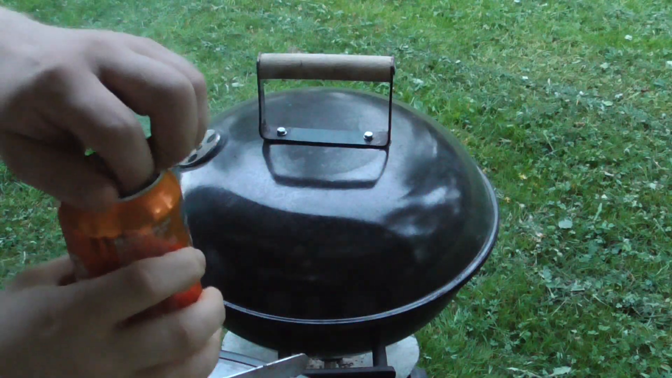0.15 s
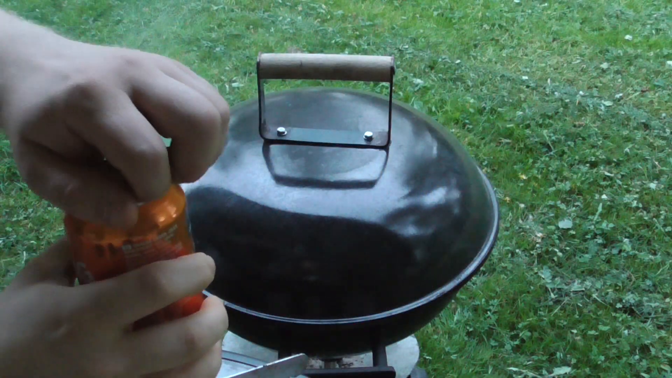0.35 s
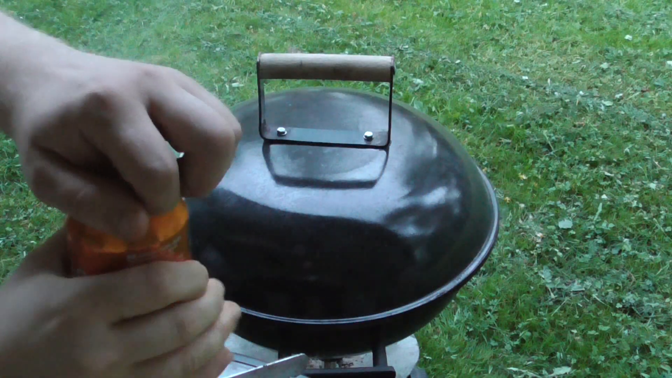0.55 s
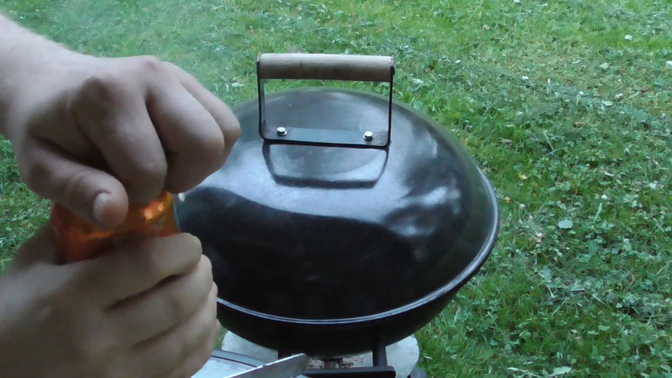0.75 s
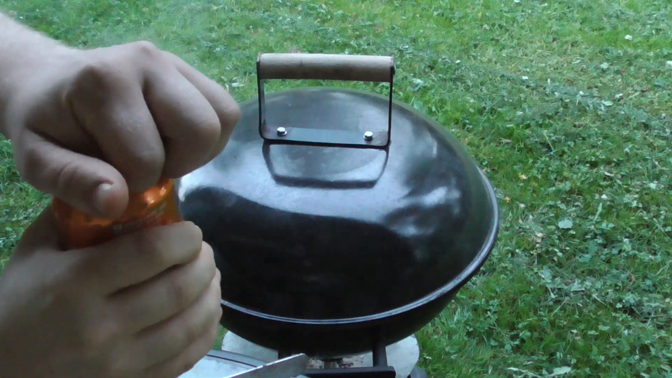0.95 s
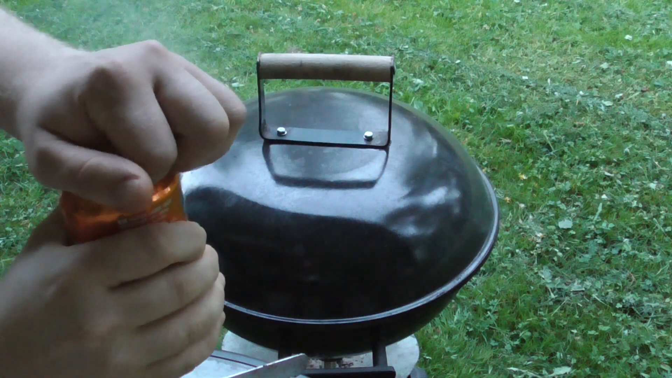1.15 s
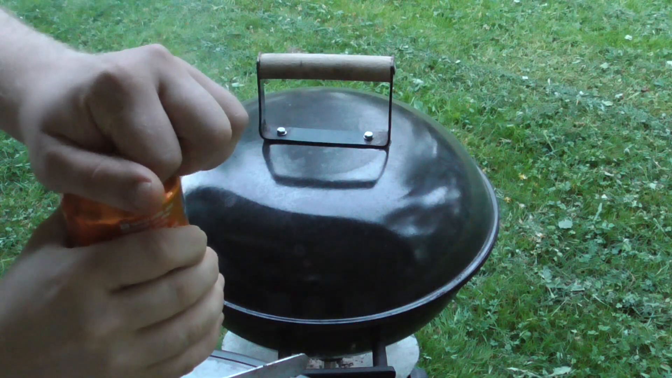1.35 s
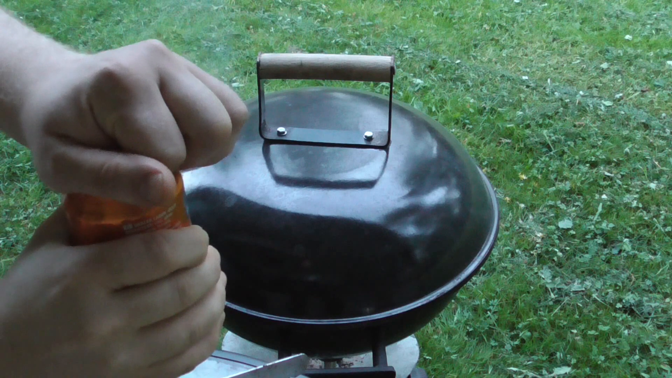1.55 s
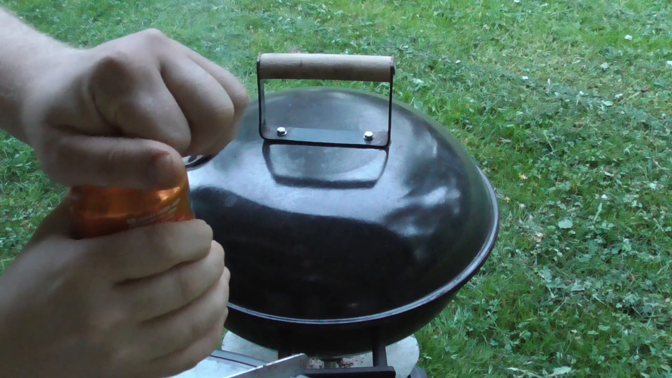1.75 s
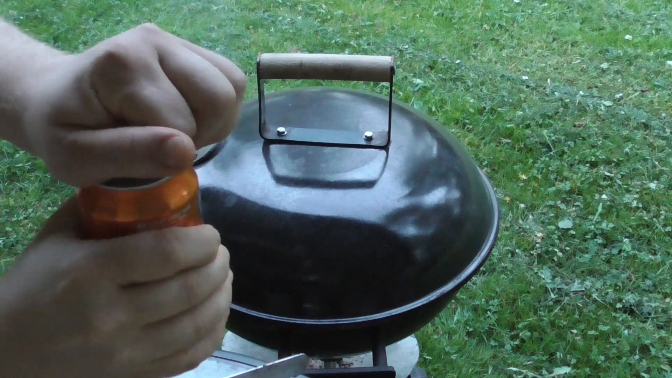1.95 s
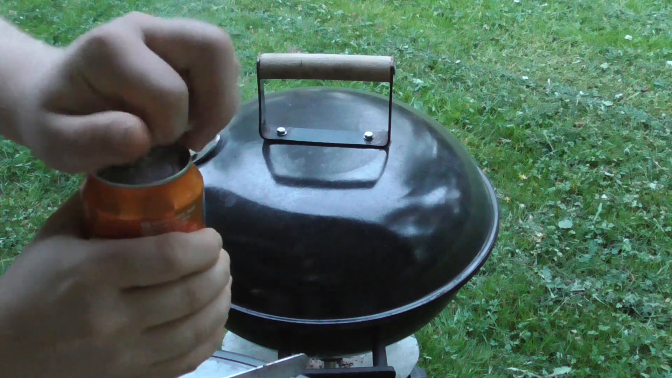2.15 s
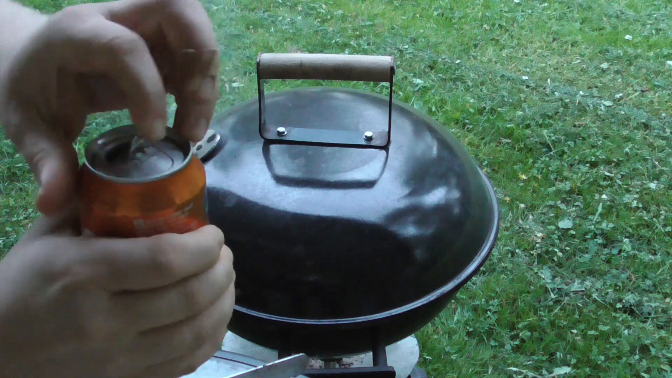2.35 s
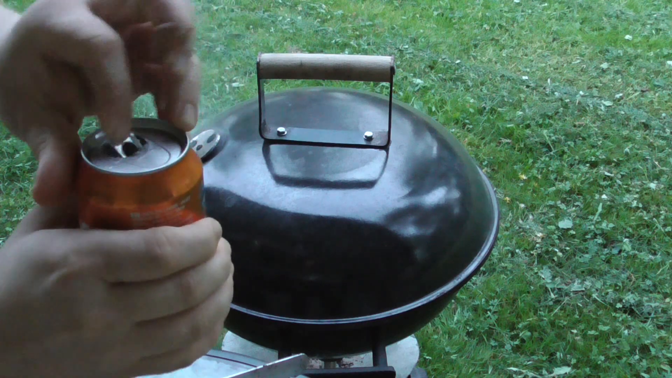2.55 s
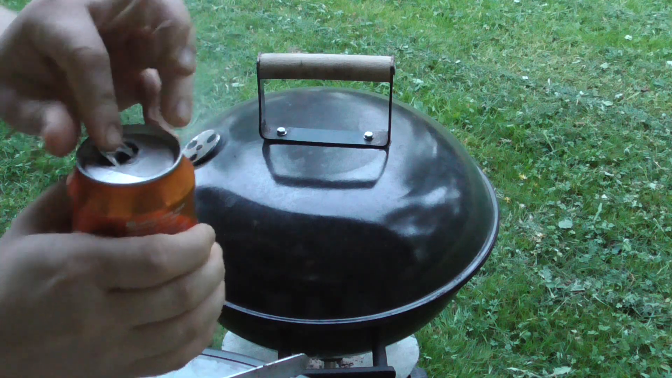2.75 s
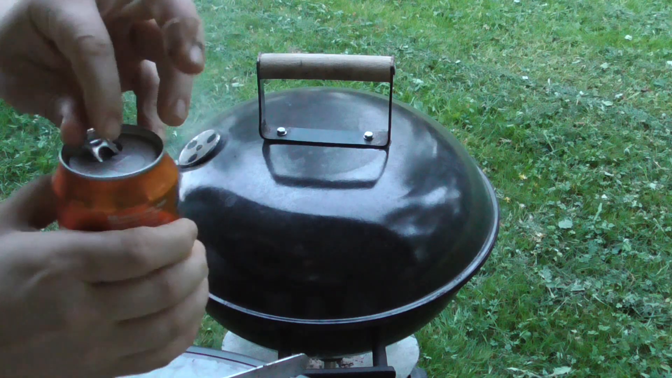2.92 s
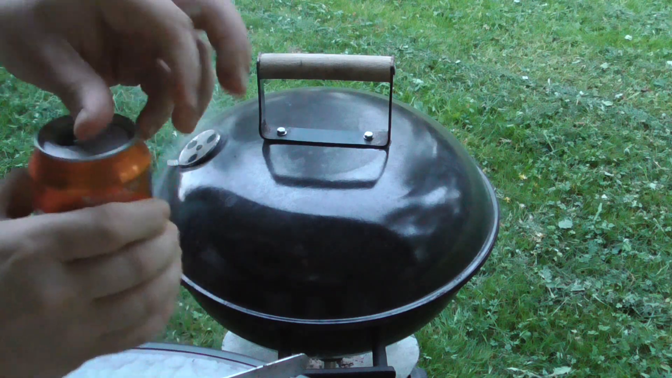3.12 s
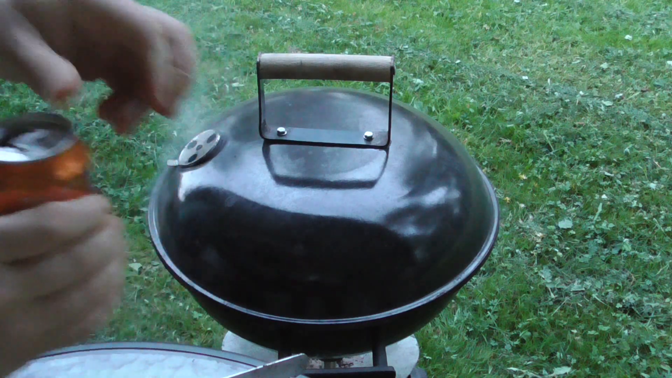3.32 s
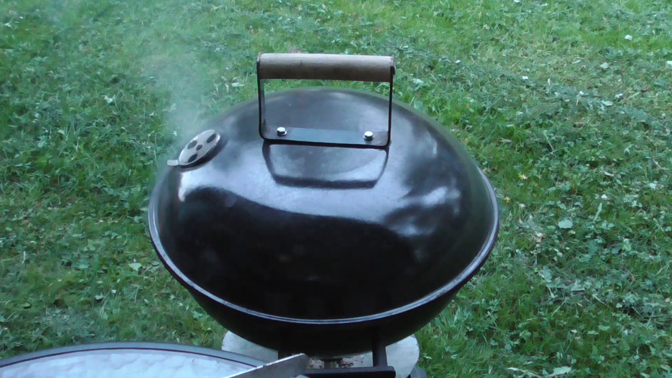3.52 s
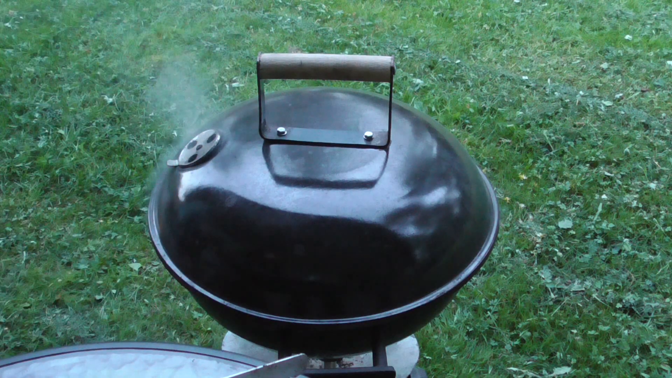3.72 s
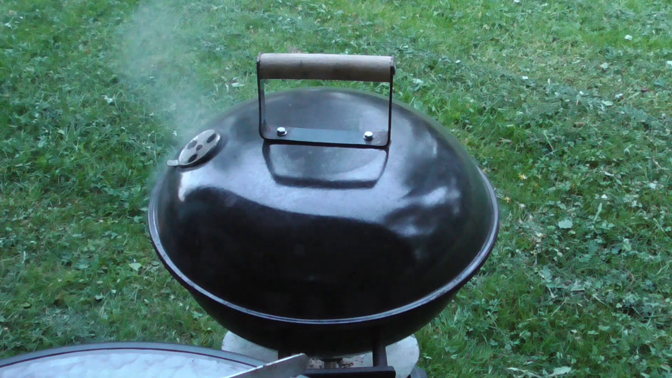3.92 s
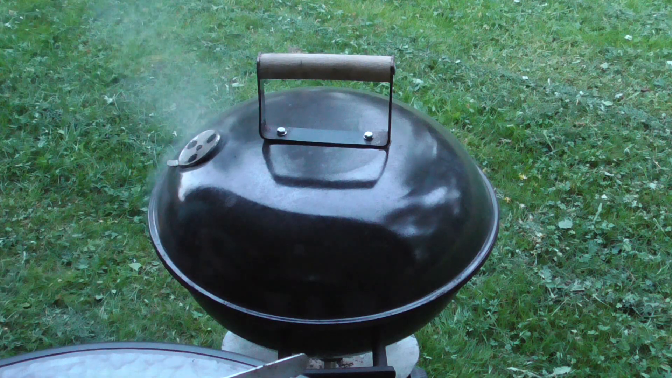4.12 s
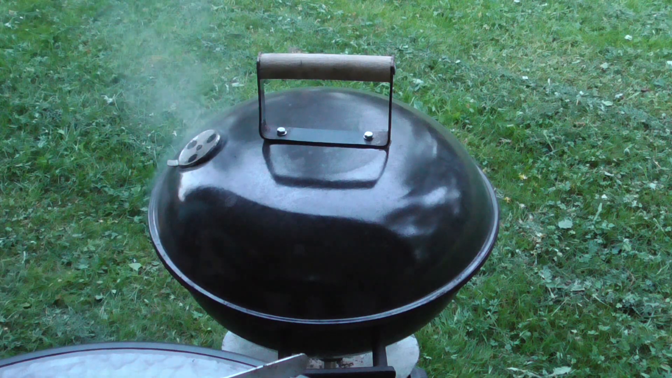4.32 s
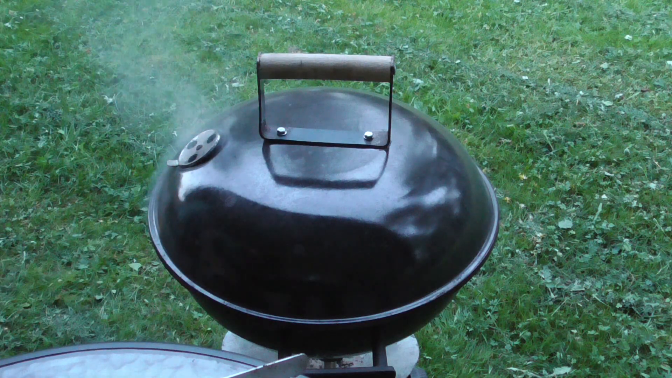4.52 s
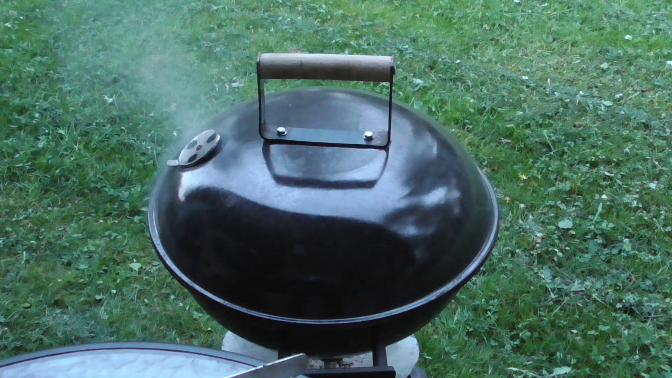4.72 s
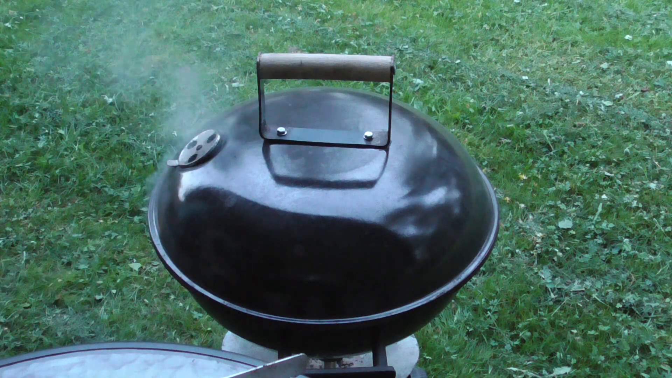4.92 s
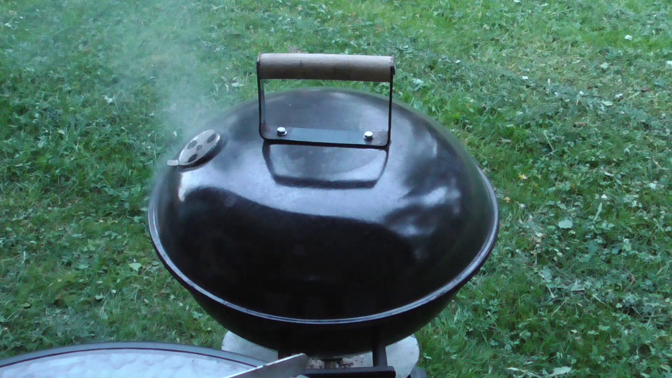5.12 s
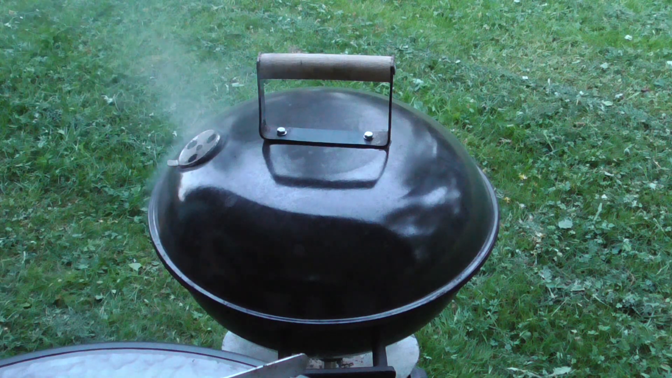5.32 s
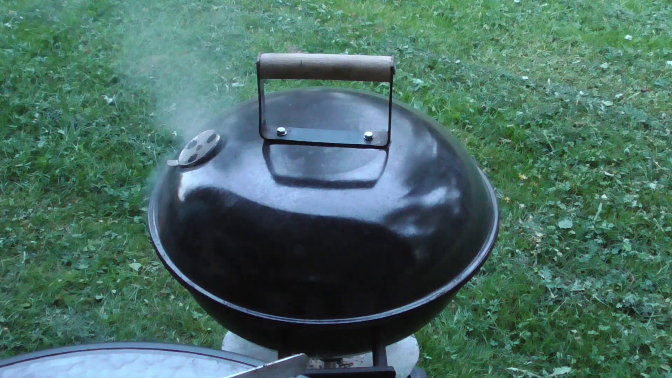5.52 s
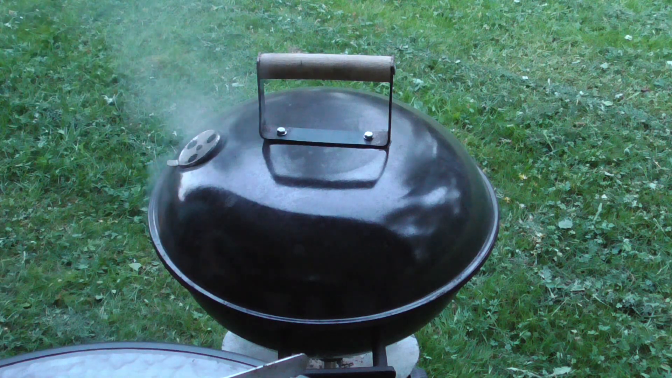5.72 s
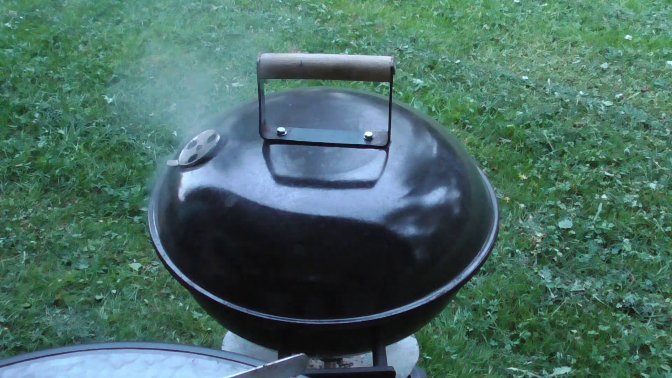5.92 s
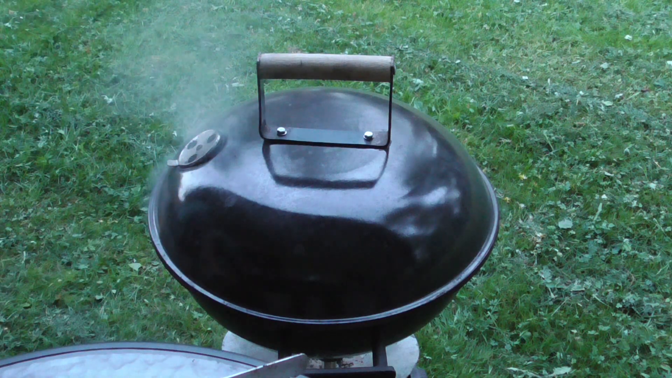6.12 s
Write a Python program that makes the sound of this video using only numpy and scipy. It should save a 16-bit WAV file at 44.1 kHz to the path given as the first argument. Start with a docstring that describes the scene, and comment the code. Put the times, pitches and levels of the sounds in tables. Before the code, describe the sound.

In a quiet garden, skin and nails brush a metal can near the microphone while a distant bird trills. The can cracks open sharply, gas spits out for a tenth of a second, then the lid tears in two more snaps, the last fuller and hollower. Small ticks and rubbing fade away, leaving far traffic, faint peeps and soft dull thuds. Near sounds are dry with slight outdoor scatter.

```python
"""Opening a drink can on a lawn

An aluminium can is heard close by: its vent cracks and gas jets out, the score line tears in two more
cracks, then fingers click and rub the tab. Struck metal is a sum of damped modes, rubbing drives the modes
with stick-slip ticks, and gas is shaped noise. Far traffic, engines, a thin whine, birds and a few dull
knocks fill the garden; a gain control sags after the loudest crack. Levels are those ahead of record()."""
import sys
import numpy as np
from scipy import signal
from scipy.fft import rfft, irfft
from scipy.io import wavfile
from scipy.ndimage import uniform_filter1d

SR = 44100
rng = np.random.default_rng(int(sys.argv[2]) if len(sys.argv) > 2 else 0)


def dump(signal):
    """Clip the signal to [-1, 1] and save it as 16-bit WAV at the path in sys.argv[1]."""
    limited = np.clip(np.atleast_2d(signal).T, -1, 1)
    pcm = np.round(limited * 32767).astype(np.int16)
    wavfile.write(sys.argv[1], SR, pcm)


N = 272097
T = np.arange(N) / SR  # time in s

# modes of the can's body and drinking hole: f/Hz, relative level/dB, t60/s when free to ring
BODY_MODES = [(590, -10, 0.035), (780, -1, 0.027), (932, 0, 0.03), (1086, 3.5, 0.01), (1250, 3, 0.023),
              (1443, -1.5, 0.04)]
# modes of the lid: f/Hz, relative level/dB, t60/s when free to ring
LID_MODES = [(2082, -6.5, 0.02), (2537, -3.5, 0.012), (3515, 2, 0.0041), (4240, -3, 0.01),
             (4822, 2.5, 0.0083), (5615, -0.5, 0.016)]
# modes of the tab and torn edge: f/Hz, relative level/dB, t60/s when free to ring
EDGE_MODES = [(6436, -5.5, 0.015), (7090, -6.5, 0.013), (8250, -3, 0.0055), (9270, -6, 0.0073),
              (10130, -3.5, 0.004), (11180, -3.5, 0.0051), (12930, -1, 0.0026), (14300, -7, 0.0058),
              (16000, -13.5, 0.0049)]


def amp(db):
    """Level: 20 dB is a factor of ten in amplitude."""
    return 10 ** (np.asarray(db) / 20)


def evened(x):
    """Normalization: scales a signal to rms 1."""
    return x / np.sqrt(np.mean(x ** 2) + 1e-20)


def follow(points, outside=None):
    """Linear interpolation: reads a table of t/s and value at every sample."""
    t, value = np.transpose(points)
    return np.interp(T, t, value, outside, outside)


def read(points, hz):
    """Spectral interpolation on a log-frequency axis."""
    f, value = np.transpose(points)
    return np.interp(np.log(hz + 1), np.log(f + 1), value)


def coloured(x, points, share=1):
    """Linear filtering: weights the spectrum by a share of a dB table."""
    hz = np.fft.rfftfreq(x.shape[-1], 1 / SR)
    return irfft(rfft(x) * amp(share * read(points, hz)), x.shape[-1])


def ring(drive, modes):
    """Modal superposition: the drive excites exponentially dying modes; a unit blow peaks at 1."""
    t = T[:4096]
    reply = np.zeros(len(t))
    for k, (hz, db, t60) in enumerate(modes):
        reply += (-1) ** k * amp(db - 60 * t / t60) * np.sin(2 * np.pi * hz * t)
    return signal.oaconvolve(drive, reply / abs(reply).max())[:len(drive)]


def resonate(x, hz, width):
    """Heterodyning: shifts the gliding frequency hz to zero, smooths twice, and shifts back."""
    turn = np.exp(2j * np.pi * np.cumsum(hz * np.ones(len(x))) / SR)
    r = np.exp(-np.pi * width / SR)
    smooth = signal.lfilter([1], np.convolve([1, -r], [1, -r]), x / turn)
    return evened((turn * smooth).real)


def wash(colour, same, patchy_db):
    """Partial coherence: stereo noise from random short-time spectra with drifting patches."""
    frames, hz = N // 256 + 5, np.fft.rfftfreq(1024, 1 / SR)
    a, b, c, d, patches = rng.standard_normal((frames, 513, 5)).T
    patches = uniform_filter1d(patches, size=10, axis=0)
    patches = evened(uniform_filter1d(patches, size=14, axis=1))
    same = np.clip(same, -1, 1)
    left = a + 1j * b
    right = same * left + np.sqrt(1 - same ** 2) * (c + 1j * d)
    gain = amp(read(colour, hz)[:, None] + patchy_db * patches)
    noise = signal.istft(np.array([left, right]) * gain, nperseg=1024, noverlap=768)[1]
    return evened(noise[:, :N])


def blows():
    """Impulsive excitation: rows of t, body, lid and edge dB, their favoured Hz, slip ms, freedom."""
    # the score line tears slip by slip: t/s, body level/dB, lid level/dB, edge level/dB,
    # lid favoured f/Hz, edge favoured f/Hz, freedom to ring (factor on t60)
    tears = [(1.2467, -35.5, -8.5, -8, 4470, 9200, 0.58), (1.2957, -28.5, -8.5, -14, 4220, 10700, .8),
             (1.6686, -38, -19, -8, 3760, 11100, 0.56), (1.6703, -33.5, -16, -2.5, 3600, 11400, 0.36),
             (1.671, -40, -24, -27.5, 4854, 9250, .5), (1.927, -37.5, -25, -23.5, 4140, 6800, 0.79),
             (1.9313, -44.5, -28.5, -17, 2080, 11260, 0.87), (1.9351, -42.5, -26.5, -22.5, 4700, 6700, 1.1),
             (1.9385, -36.5, -26, -24.5, 3400, 6740, 1.4), (1.9461, -34.5, -27.5, -15, 2100, 11270, 0.8),
             (1.9502, -33.5, -25, -15.5, 2070, 6570, 1.1), (1.9553, -34.5, -15.5, -14, 3440, 10160, 0.45),
             (1.9566, -20, -9.5, -5, 3460, 10050, 1.1), (1.9578, -24.5, -11, -9.5, 2026, 8530, 0.74)]
    # fingers and tab tap the lid: t/s, body level/dB, lid level/dB, edge level/dB,
    # body favoured f/Hz, freedom to ring (factor on t60)
    taps = [(0.584, -42, -46, -57, 1450, 2.3), (0.8795, -51, -50, -68, 1430, .8),
            (0.9886, -55.5, -46.5, -50, 1590, .8), (2.249, -36, -34.5, -49, 820, 0.73),
            (2.2664, -47, -48, -59.5, 846, .7), (2.3872, -33.5, -44.5, -43, 1100, 1.6),
            (2.398, -47, -49, -63, 1030, .9), (2.4454, -42.5, -62, -65, 1140, 1.1),
            (2.572, -38.5, -41, -37, 1166, 0.75), (2.739, -51, -60, -39, 1250, .7),
            (2.944, -42, -60, -57, 885, 1.1), (2.9549, -40.5, -57.5, -53, 888, 1.4),
            (3.1275, -41, -44.5, -68, 1390, 1.3), (3.635, -42.5, -48.5, -53, 1340, .8)]
    # the tab ticks on its rivet as it bends: t/s, body level/dB, lid level/dB, edge level/dB,
    # lid favoured f/Hz, edge favoured f/Hz
    ticks = [(1.5593, -61, -53, -43.5, 4500, 10690), (2.6018, -41.5, -44, -33, 4700, 9200),
             (2.6083, -46, -34, -37, 4700, 9700), (2.6134, -45, -38, -35, 4300, 9740),
             (2.6177, -41.5, -35, -28, 4300, 9350), (2.6254, -38.5, -46, -22.5, 3800, 9400),
             (2.631, -33.5, -27, -41, 3260, 8590), (2.6489, -42, -44, -40, 4300, 11110),
             (3.5403, -60, -43.5, -36, 3420, 7460), (3.5743, -62, -38.5, -38.5, 4700, 7430)]
    hole_opens_s = 1.9556
    shut_hz, open_hz = 1352, 710  # the body rings lower once the drinking hole is open
    tap_lid_hz, tap_edge_hz, tick_body_hz = 2000, 9500, 961
    tear_ms, tap_ms, tick_ms = 0.55, 0.43, 0.35  # time scale of a slip
    tick_free = 0.6  # fingers damp the metal

    rows = []
    for s, body_db, lid_db, edge_db, lid_hz, edge_hz, free in tears:
        body_hz = open_hz if s > hole_opens_s else shut_hz
        rows.append((s, body_db, lid_db, edge_db, body_hz, lid_hz, edge_hz, tear_ms, free))
    rows += [(*row, tap_lid_hz, tap_edge_hz, tap_ms, free) for *row, free in taps]
    rows += [(*row[:4], tick_body_hz, *row[4:], tick_ms, tick_free) for row in ticks]
    return rows


def clicks():
    """Local modal excitation: each slip, a run of tiny fractures, shakes modes near its spot most."""
    linger_db, linger_longer = -21.5, 5.1  # a faint part escapes the grip and lasts longer
    out, t = np.zeros(N + 4400), T[:4400]
    fade = np.cos(t / t[-1] * np.pi / 2)
    rows = blows()
    chance = rng.standard_normal((len(rows), 4406))
    for (s, *levels_db, body_hz, lid_hz, edge_hz, ms, free), draw in zip(rows, chance):
        here = out[round(s * SR):][:len(t)]  # a view into out
        u = t * 1000 / max(ms, .05)
        slip = u * np.exp(-2 * u)
        parts = zip((body_hz, lid_hz, edge_hz), (BODY_MODES, LID_MODES, EDGE_MODES))
        for k, (spot_hz, modes) in enumerate(parts):
            hz, db, t60 = np.transpose(modes)[:, :, None]
            hz = hz * (1 + .015 * draw[k])  # grip and bending detune the metal from blow to blow
            near_db = db - np.minimum(30 * abs(np.log2(hz / spot_hz)), 17)
            fall_db = 60 * t / (t60 * max(free, .1))
            dying = amp(near_db - fall_db) + amp(near_db + linger_db - fall_db / linger_longer)
            swell = signal.fftconvolve(slip[None], dying * fade, axes=1)[:, :len(t)]
            # fractures come in no order, so phases scatter
            phase = 9 * draw[3 + k] * np.arange(1, len(modes) + 1)[:, None]
            sound = (swell * np.sin(2 * np.pi * hz * t + phase)).sum(0)
            here += amp(levels_db[k]) * sound / abs(sound).max()
        here += amp(levels_db[2] + 3) * slip * np.diff(draw[5:])  # the bare crack
    return out[:N]


def jet():
    """Turbulent jet noise: hiss splutters as foam crosses the vent; row 0 is gas, row 1 side eddies."""
    # colour of the gas hiss, with slight peaks and dips: f/Hz, relative level/dB
    jet_colour = [(300, -32), (1500, -17), (2700, -22.5), (4900, -12), (5800, -10), (6800, -1.5),
                  (8000, -7), (9200, -4.5), (10200, -8), (11500, -4), (12600, -9), (14500, -7.5),
                  (15700, -14), (16100, -44)]
    # gas rushing out of the vent: t/s, level/dB
    vent = [(1.250, -52), (1.256, -28.5), (1.282, -16), (1.3, -19), (1.329, -24), (1.343, -40.5),
            (1.365, -50), (1.43, -61.5), (1.5, -93)]
    # a puff after each later crack: t/s, level/dB, gush length/s, brightness (negative dulls)
    puffs = [(1.675, -37, .011, 0.33), (1.96, -29, 0.016, -1.2)]
    widens_s, narrow_bright, wide_bright = 1.296, 0.49, 0.05  # the jet dulls as the vent widens
    rise_s, gush_sag_db = 0.0033, -3.5
    drop_db, drop_s, fade_db_per_s = -10.5, 0.011, 298

    hiss = evened(coloured(rng.standard_normal((2, N)), jet_colour))
    dull = evened(coloured(hiss, [(1000, 1), (16000, -18.5)]))
    edge = hiss - dull  # adding this brightens
    splutter = evened(uniform_filter1d(rng.standard_normal(N), size=40))
    splutter = np.clip(splutter, -2, 2)
    vent_bright = np.where(T < widens_s, narrow_bright, wide_bright)
    out = (hiss + vent_bright * edge) * amp(follow(vent, -200))
    for s, db, gush, bright in puffs:
        t = T - s
        shape_db = np.interp(t, [0, gush, gush + drop_s], [0, gush_sag_db, gush_sag_db + drop_db])
        shape_db -= fade_db_per_s * np.maximum(t - gush - drop_s, 0)
        rise = np.clip(1 + t / rise_s, 0, 1) ** 2  # full at the listed time
        out += (hiss + bright * edge) * rise * amp(db + shape_db)
    return out * amp(1.4 * splutter)


def pushes():
    """Near-field air displacement: the jumping lid pushes air unlike past the two microphone ports."""
    # t/s, left half-amplitude, right half-amplitude (before decay), swing f/Hz, t60/s
    swings = [(1.2467, 0.17, 0.066, 445, 0.0026), (1.67, 0.14, -0.094, 302, 0.0057),
              (1.9568, -0.078, 0.22, 239.3, .012)]
    out = np.zeros((2, N))
    for s, left, right, hz, t60 in swings:
        t = np.maximum(T - s, 0)
        out += np.outer([left, right], 2 * np.sin(2 * np.pi * hz * t) * amp(-60 * t / t60))
    return out


def rubs():
    """Stick-slip friction: skin and nail make dense uneven ticks that excite the can's modes."""
    # strokes of skin and nail: first, second and third level breakpoint t/s,
    # body level/dB, lid level/dB, edge level/dB
    strokes = [(-.01, 0.0, 0.092, -67, -52.5, -54.5), (0.186, 0.294, 0.29, -76, -67, -57),
               (0.366, 0.448, 0.53, -71, -63.5, -61.5), (0.646, 0.68, 1.6, -71, -72, -72),
               (1.865, 1.941, 1.926, -62, -60.5, -59.5), (2.361, 2.395, 2.39, -49.5, -65, -57),
               (2.596, 2.621, 2.665, -43.5, -47.5, -45), (3.097, 3.127, 3.31, -55, -61, -59.5)]
    first_db, third_db = -7.5, -44  # breakpoint levels against the second
    ticks = rng.standard_normal(N) * amp(1.98 * rng.exponential(1, N))
    ticks = ticks * (rng.random(N) < 2500 / SR)  # on average 2500 ticks a second
    out = np.zeros(N)
    for column, modes in enumerate((BODY_MODES, LID_MODES, EDGE_MODES)):
        level = np.zeros(N)
        for stroke in strokes:
            shape_db = np.interp(T, stroke[:3], [first_db, 0, third_db], -200, -200)
            level += amp(stroke[3 + column] + shape_db)
        out += ring(ticks * level, modes) / np.std(ring(ticks, modes))
    return out


def widen(x):
    """Path difference: two microphone ports hear a near source with unlike levels and phases."""
    # f/Hz, side against mid level/dB, lead of the side/rad
    side_share = [(203, -7.5, 1.2), (608.5, -6.5, 1.4), (1200, -11, 0.37), (3010, -18.5, 1.2),
                  (7000, -12.5, 1.0), (10000, -15.5, 2.2), (13000, -4.5, 0.57), (16000, 0, 1.7)]
    hz = np.fft.rfftfreq(N, 1 / SR)
    f, db, lead = np.transpose(side_share)
    turn = np.exp(1j * np.interp(hz, f, lead))
    side = irfft(rfft(x) * amp(np.interp(hz, f, db)) * turn, N)
    return x + [side, -side]


def scatter(x):
    """Diffuse reflection: grill lid, hands and ground return sound, each band dying at its own rate."""
    # f/Hz, t60/s
    garden = [(300, 0.26), (1000, 0.21), (3000, 0.2), (8000, 0.098), (15000, .08)]
    hz, t, z = signal.stft(rng.standard_normal((2, SR // 2)), SR, nperseg=128)
    tail = signal.istft(z * amp(-60 * t / read(garden, hz)[:, None]), SR, nperseg=128)[1]
    tail = tail * np.clip(np.arange(tail.shape[1]) / 450, 0, 1)  # builds up over about 10 ms
    return signal.oaconvolve(x, tail / np.linalg.norm(tail[0]), axes=1)[:, :N]


def knocks():
    """Damped impact: soft blows nearby on something dull, each dragging on in a short scuff."""
    # t/s, drive level/dB, high modes against low modes level/dB
    hits = [(4.685, -54, 0), (5.113, -59.5, 13), (5.141, -53.5, 16), (5.187, -50.5, 9.5), (5.509, -59, -7),
            (5.526, -49.5, -18), (5.615, -45, -15), (5.669, -61, -11), (5.772, -58, -11),
            (5.812, -59.5, 10.5)]
    # f/Hz, relative level/dB, t60/s
    dull_modes = [(179, 6.5, 0.096), (376, 6.5, 0.12), (738, 3, 0.019), (1078, -2, 0.045),
                  (1393, -1.5, 0.028), (2025, -11, 0.034)]
    low, high = np.zeros((2, N + 1500))
    t = T[:1500]
    for (s, db, rel_db), grit in zip(hits, rng.standard_normal((len(hits), 1500))):
        blow = 0.061 * grit * np.exp(-t / 0.0097) + (t == 0)
        start = round(s * SR)
        low[start:][:1500] += amp(db) * blow
        high[start:][:1500] += amp(db + rel_db) * blow
    soft = signal.windows.hann(15) / 7
    struck = ring(low, dull_modes[:2]) + ring(high, dull_modes[2:])
    return np.convolve(struck, soft, "same")[:N]


def bird():
    """Frequency modulation: whistled notes start high and warble fast; plain peeps fall steadily."""
    # a far bird's runs of three quick notes, each a little lower: t/s, level/dB, base f/Hz of the first
    trills = [(0.064, -73.5, 3230), (.366, -68, 3270), (.69, -67, 3240), (1.018, -69, 3220)]
    # its single notes: t/s, level/dB, base f/Hz
    chirps = [(0.23, -69, 3180), (0.549, -67, 3330), (.88, -67.5, 3130)]
    # a second, fainter bird's falling peeps: t/s, level/dB, middle f/Hz, length/s
    peeps = [(4.55, -76.5, 2810, 0.014), (4.632, -75, 2800, 0.016), (4.692, -78, 2790, 0.017),
             (4.755, -73, 2750, 0.01), (4.898, -75, 3460, 0.027), (4.958, -73, 3430, 0.022),
             (5.015, -77, 3400, .022), (5.632, -80, 3350, 0.0544), (5.751, -77.5, 3260, 0.039),
             (5.842, -78, 3200, 0.065), (5.983, -77, 3200, 0.049)]
    gap_s, step_hz, note_s, peep_fall_hz = .046, -64, 0.033, 550
    hz, level = np.full(N, 3200.), np.zeros(N)
    runs = [(s + k * gap_s, db, f + k * step_hz) for s, db, f in trills for k in range(3)]
    for s, db, pitch_hz in runs + chirps:
        u = (T - s) / note_s
        on = (u > 0) & (u < 1)
        glide = 0.15 * np.exp(-u[on] / 0.1)
        warble = 0.092 * np.cos(2 * np.pi * 90 * (T[on] - s))
        hz[on] = pitch_hz * (1 + glide + warble)
        level[on] = amp(db) * np.sqrt(2 * np.sin(np.pi * u[on]))
    for s, db, pitch_hz, length in peeps:
        on = (T > s) & (T < s + length)
        u = (T[on] - s) / length
        hz[on] = pitch_hz - peep_fall_hz * (u - .5)
        level[on] = amp(db) * np.sqrt(2 * np.sin(np.pi * u))
    return level * np.sin(2 * np.pi * np.cumsum(hz) / SR)


def far_tones():
    """Harmonic and narrow-band sources: wavering engine drones and a thin whine, slightly louder left."""
    # level of the whine before the port gain: t/s, level/dB
    whine = [(0.0, -79.5), (0.8, -71), (2.0, -90), (2.75, -71), (3.3, -70), (3.9, -68), (5.4, -85.5),
             (6.17, -104)]
    # engines that slow evenly, one a row: mean firing f/Hz at the start, loss/(Hz/s)
    engines = [(90.8, 3.5), (114.5, 0.97)]
    # one list for each engine, before the port gain and waver: t/s, level/dB
    engine_levels = [
        [(0, -66), (.3, -63), (.6, -68.5), (1.0, -69.5), (2.5, -66.5), (2.8, -85)],
        [(0, -74), (.5, -68), (1.4, -80.5), (2.4, -77), (4.0, -67.5), (4.7, -74), (6.17, -72)],
    ]
    # one row for each engine: relative level/dB of multiples 1, 2, 3 of the firing rate
    engine_orders = [
        [0.1, 1, -3],
        [0.099, -11.5, -30],
    ]
    out = amp(follow(whine)) * resonate(rng.standard_normal(N), 1590 - 10 * T, 60)
    for (hz, loss), levels, orders in zip(engines, engine_levels, engine_orders):
        for k, order_db in enumerate(orders):
            waver = uniform_filter1d(rng.standard_normal((2, N)), size=5000)
            waver = evened(uniform_filter1d(waver, size=5000))
            rate = (hz - loss * T) * (1 + .01 * waver[0])
            turns = (k + 1) * np.cumsum(rate) / SR
            level = amp(follow(levels) + order_db + 2.1 * waver[1])
            out += level * np.sin(2 * np.pi * turns)
    return out * amp([[.6], [-.6]])  # port gain/dB, left and right


def traffic():
    """Distant broadband noise: a low, partly coherent rumble that swells and sinks."""
    # t/s, level/dB
    swell = [(0, -62), (.5, -60), (1.15, -61), (2.0, -69.5), (2.5, -64.5), (3.0, -63), (3.6, -72),
             (4.6, -71.5), (5.3, -63.5), (6.17, -67)]
    # f/Hz, relative level/dB
    rumble_colour = [(25, -18), (55, -8.5), (85, -11), (160, 8.5), (400, -1.5), (900, -3.5), (1800, -46.5)]
    return amp(follow(swell)) * wash(rumble_colour, 0.38, patchy_db=3.5)


def air():
    """Background noise: garden and microphone hiss with coherence that varies over frequency."""
    # f/Hz, relative level/dB
    hiss_colour = [(40, -22), (74, -19), (104, -6), (250, -4.5), (550, -5.5), (1180, -12.5), (1650, -15),
                   (1900, -23), (4000, -22.5), (9000, -18), (15600, -20), (16000, -53.5)]
    # f/Hz, left-right likeness
    likeness = [(60, 0.93), (200, 0.16), (800, 0.18), (3000, 0.33), (7000, 0.22), (10000, 0.74),
                (15000, .1)]
    # unevenness of the drift: f/Hz, spread/dB
    patchy = [(500, 2.5), (2000, 2.7), (5000, 1.45)]
    hz = np.fft.rfftfreq(1024, 1 / SR)
    return amp(-58.5) * wash(hiss_colour, read(likeness, hz)[:, None], read(patchy, hz)[:, None])


def scene():
    """Superposition: direct and scattered near sounds, then the garden."""
    struck = clicks() + rubs() + knocks()
    gas, eddies = jet()
    near = widen(struck + gas) + pushes()
    near += amp(-14.5) * scatter((struck + amp(1.0) * gas)[None])
    near += amp(-9.5) * eddies * [[1], [-1]]
    song = bird()
    far_song = song + amp(-4) * scatter(song[None])
    return near + far_song + far_tones() + traffic() + air()


def record(dry):
    """Transducer response and compression: port colour, sluggish gain control, then a band limit."""
    # f/Hz, left against right level/dB
    port_balance = [(100, -0.5), (700, 1), (1500, -1.5), (8000, .5), (11000, 0.5), (13000, -9),
                    (16000, 5.5)]
    # f/Hz, response level/dB
    microphone = [(30, -11), (70, -2), (1800, 1), (2600, 0), (3600, 4), (4800, 1.5), (6000, -5), (7000, -3),
                  (9500, 1), (11500, 1), (13500, -3), (16500, -7.5)]
    ports = np.array([coloured(dry[0], port_balance, .5), coloured(dry[1], port_balance, -.5)])
    ports = coloured(ports, microphone)
    # the gain control listens mostly below 1500 Hz
    heard = signal.lfilter(*signal.butter(1, 1500, fs=SR), ports)
    power = abs(uniform_filter1d((heard ** 2).mean(0), size=600))
    power_db = 10 * np.log10(power + 1e-12)
    fall = T * 45  # the held peak recovers 45 dB a second
    held_db = np.maximum.accumulate(power_db + fall) - fall
    over_db = np.maximum(held_db + 38.5, 0)  # excess over a -38.5 dB threshold
    lag = np.exp(-1 / (.08 * SR))  # 80 ms time constant
    ducked = ports / amp(0.87 * signal.lfilter([1 - lag], [1, -lag], over_db))
    squeezed = .9 * np.tanh(ducked / .9)  # the preamplifier rounds the highest peaks
    band = signal.firwin(255, 16600, window=("kaiser", 9), fs=SR)  # cutoff in Hz
    return signal.oaconvolve(squeezed, band[None], "same")


dry = scene()
out = record(dry)
dump(out)
```